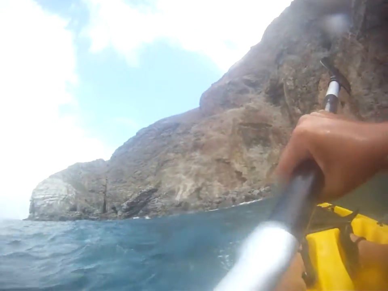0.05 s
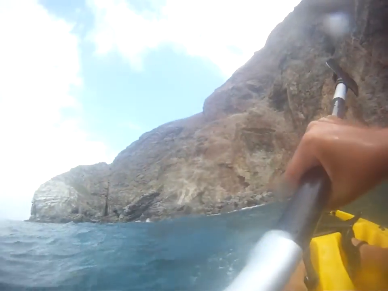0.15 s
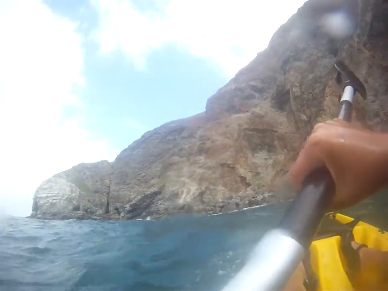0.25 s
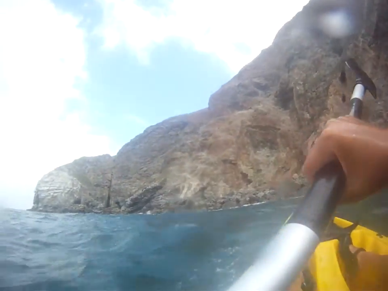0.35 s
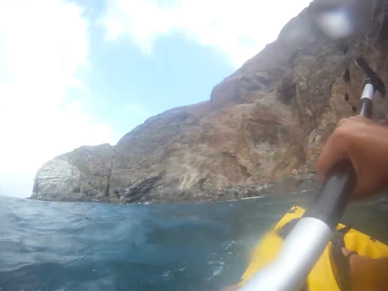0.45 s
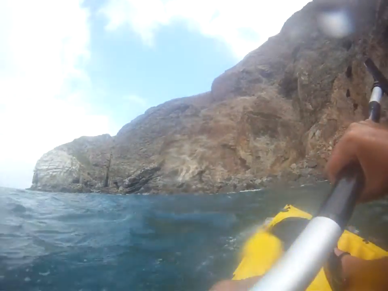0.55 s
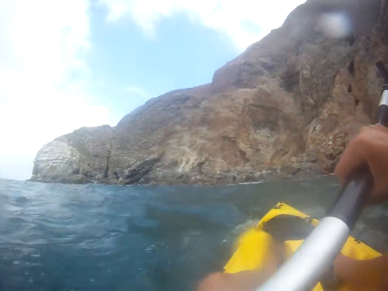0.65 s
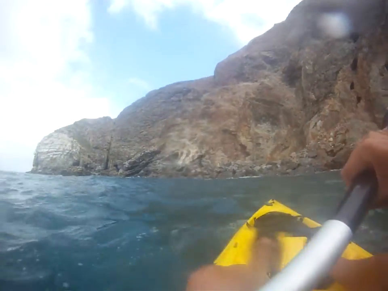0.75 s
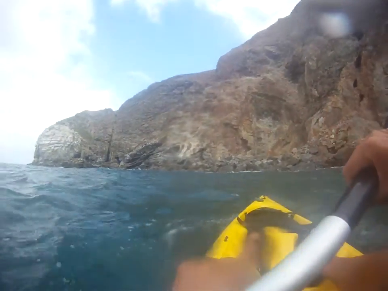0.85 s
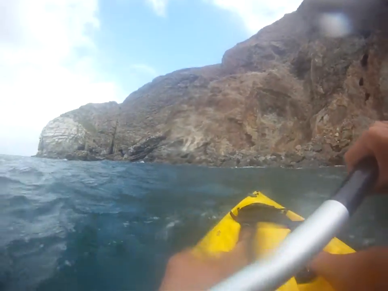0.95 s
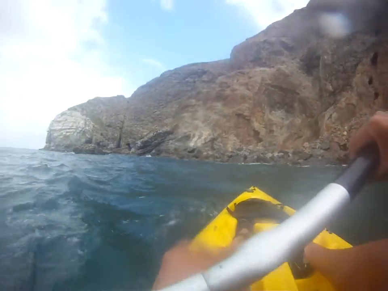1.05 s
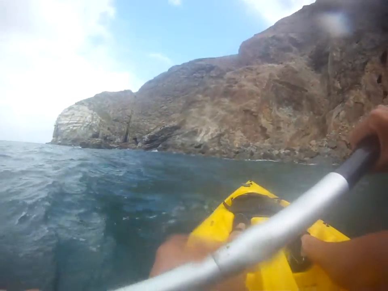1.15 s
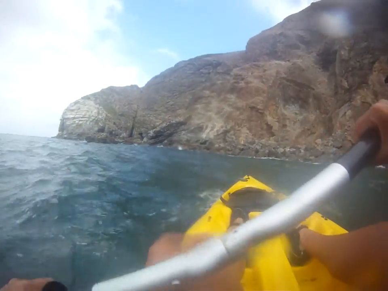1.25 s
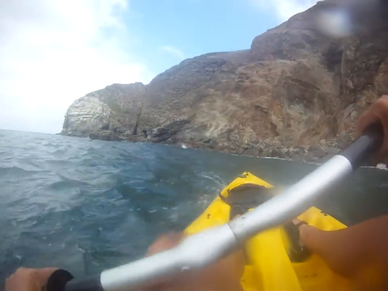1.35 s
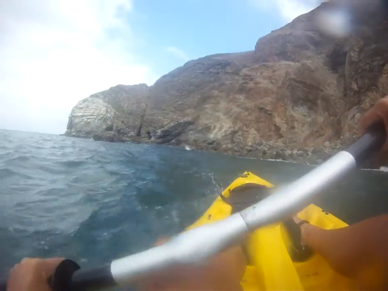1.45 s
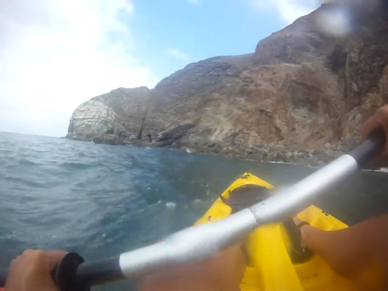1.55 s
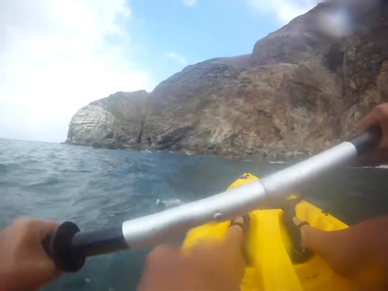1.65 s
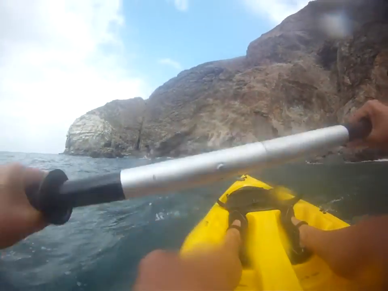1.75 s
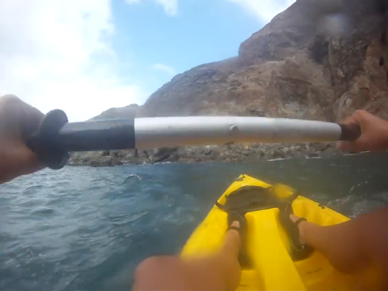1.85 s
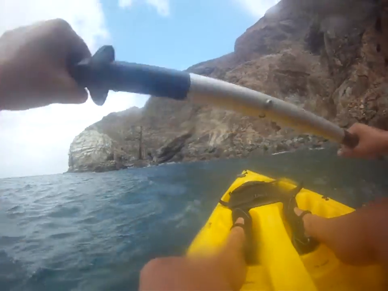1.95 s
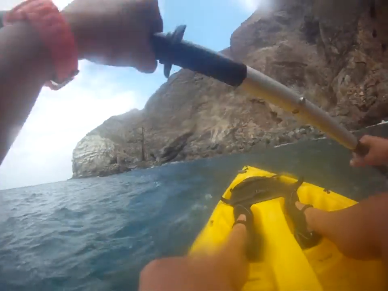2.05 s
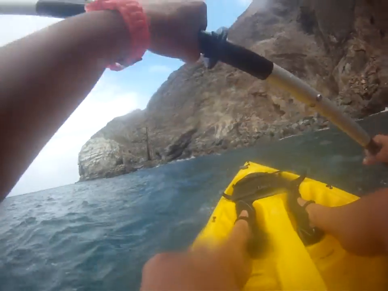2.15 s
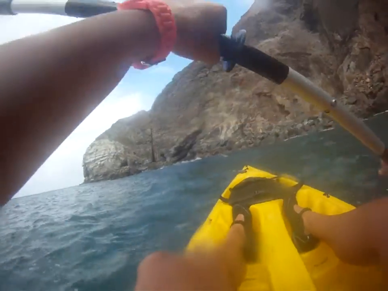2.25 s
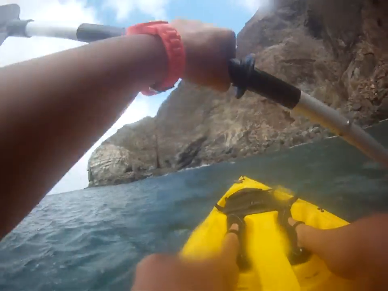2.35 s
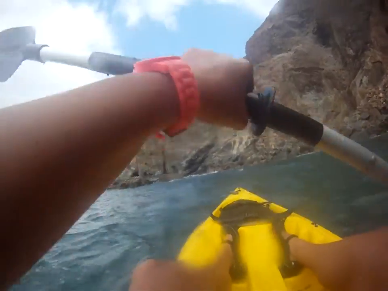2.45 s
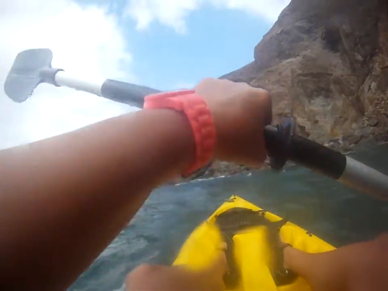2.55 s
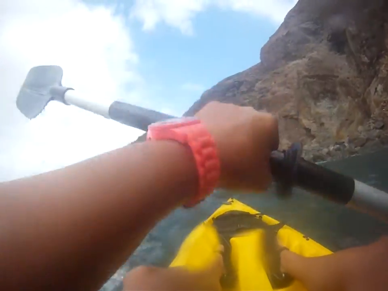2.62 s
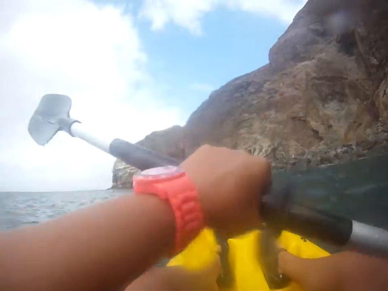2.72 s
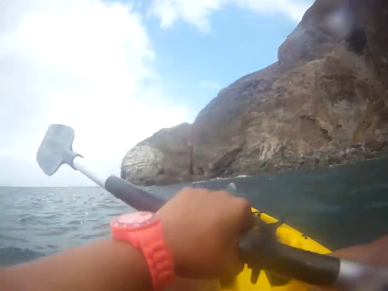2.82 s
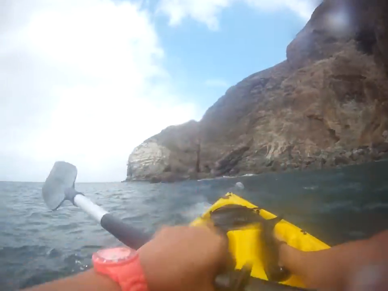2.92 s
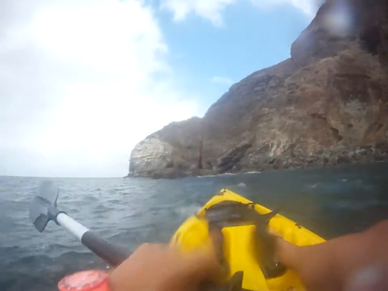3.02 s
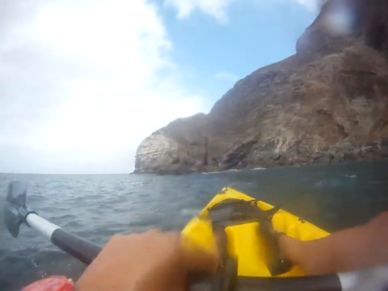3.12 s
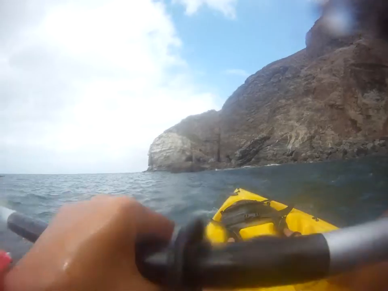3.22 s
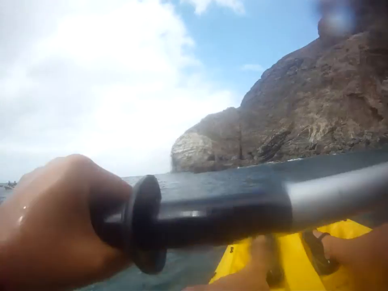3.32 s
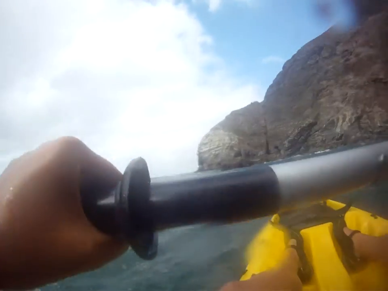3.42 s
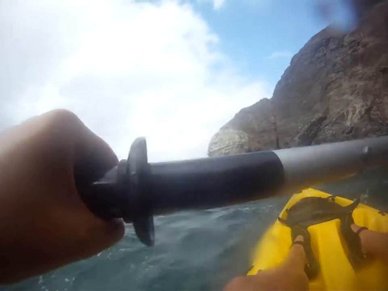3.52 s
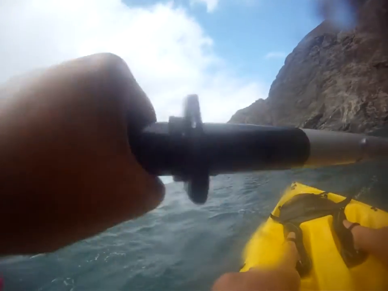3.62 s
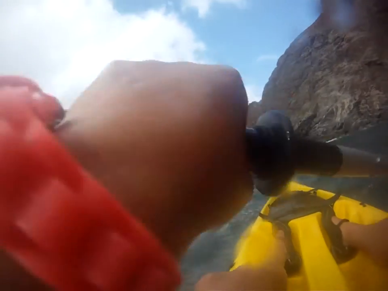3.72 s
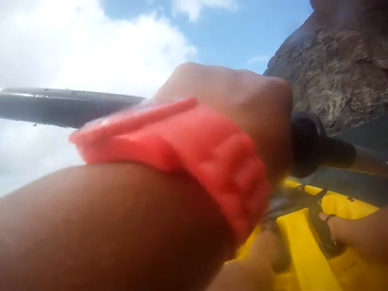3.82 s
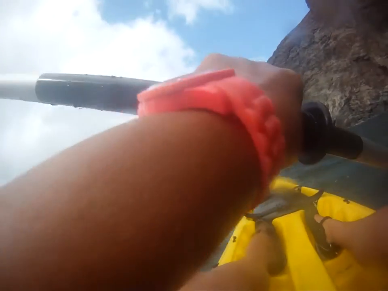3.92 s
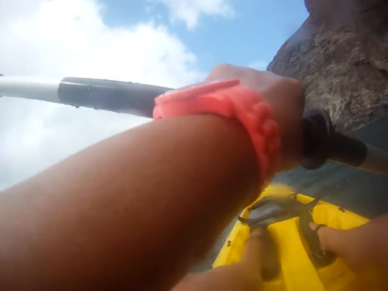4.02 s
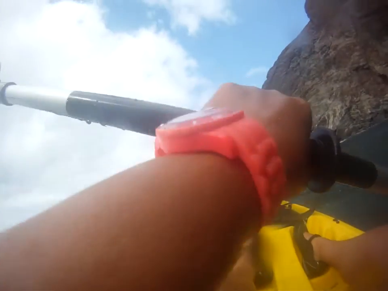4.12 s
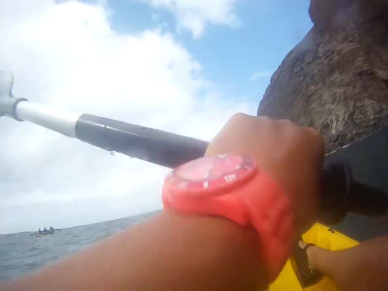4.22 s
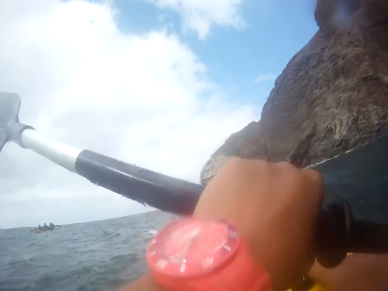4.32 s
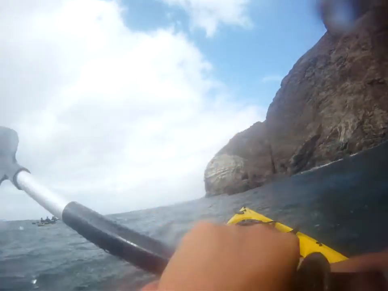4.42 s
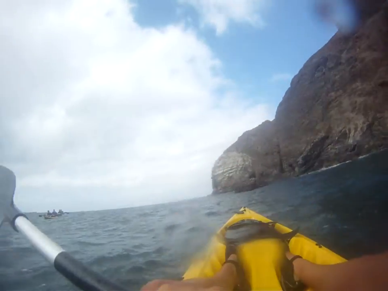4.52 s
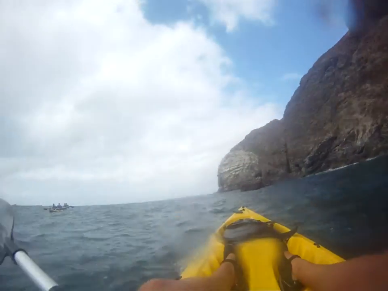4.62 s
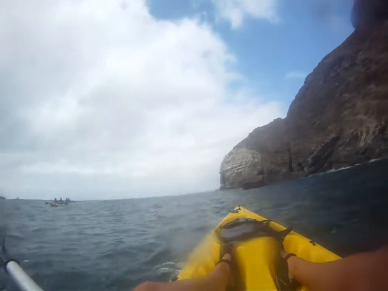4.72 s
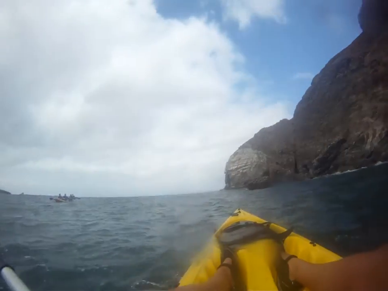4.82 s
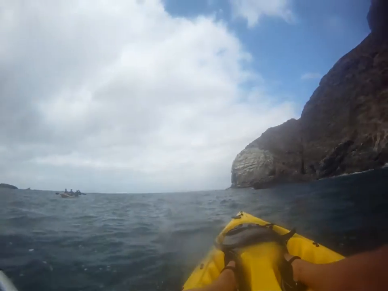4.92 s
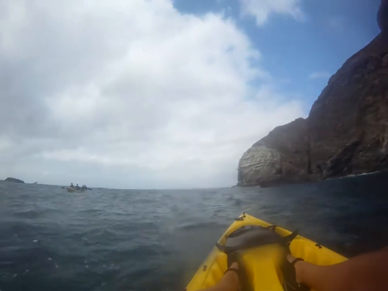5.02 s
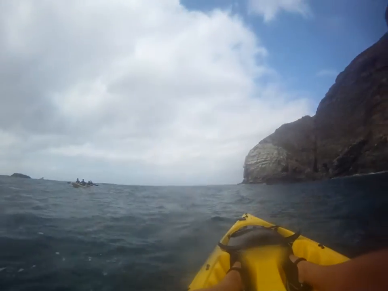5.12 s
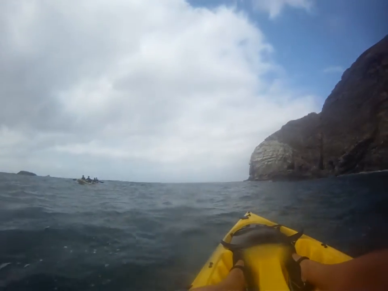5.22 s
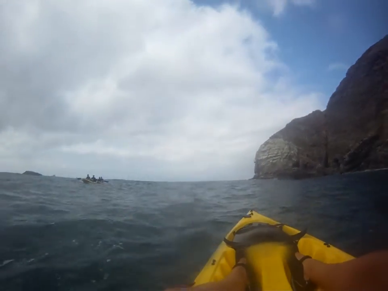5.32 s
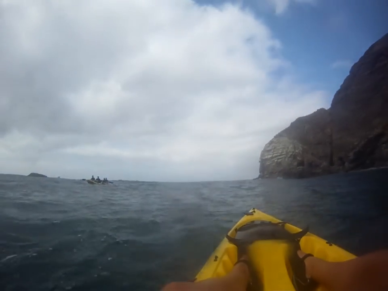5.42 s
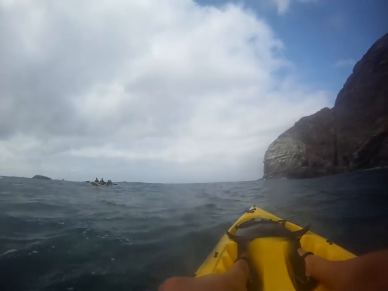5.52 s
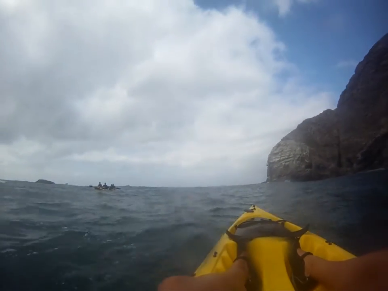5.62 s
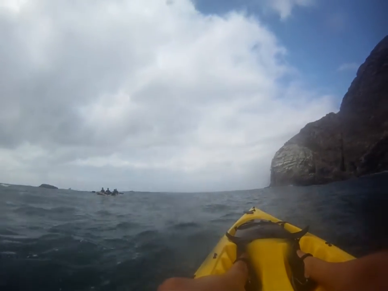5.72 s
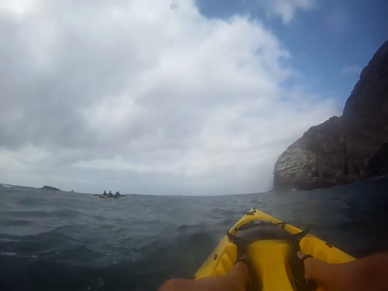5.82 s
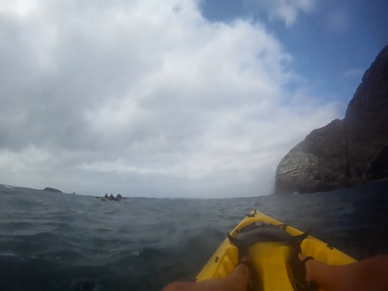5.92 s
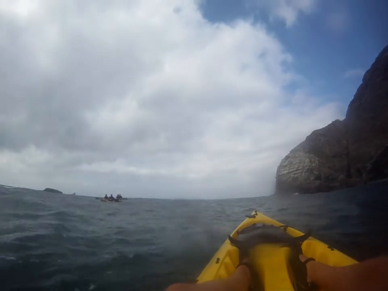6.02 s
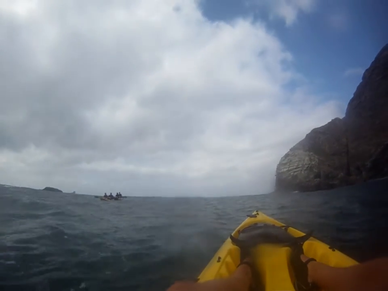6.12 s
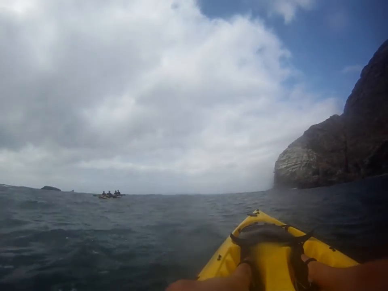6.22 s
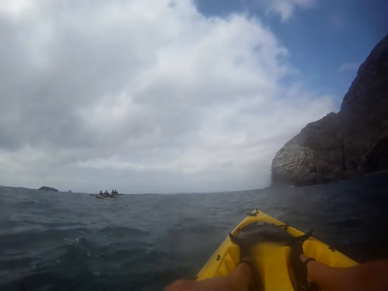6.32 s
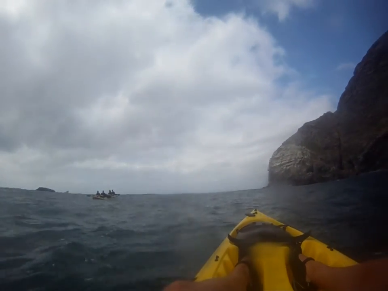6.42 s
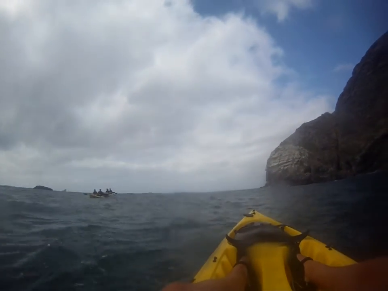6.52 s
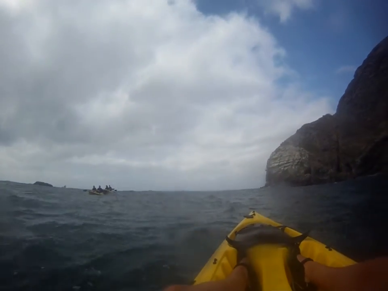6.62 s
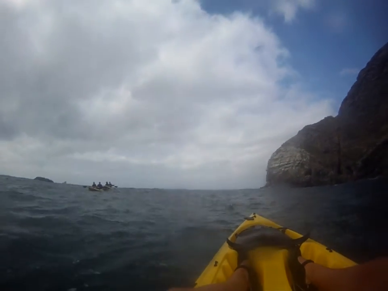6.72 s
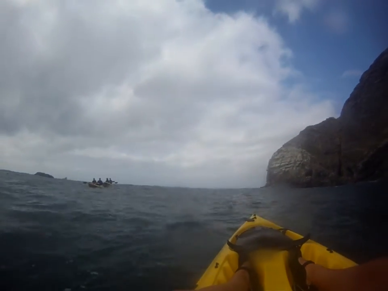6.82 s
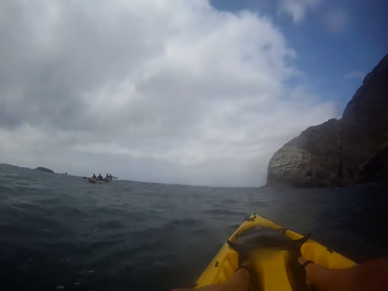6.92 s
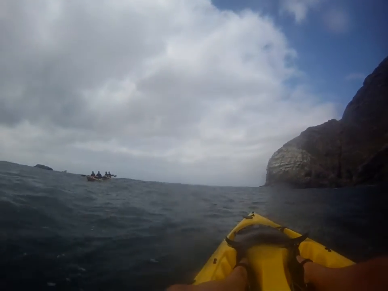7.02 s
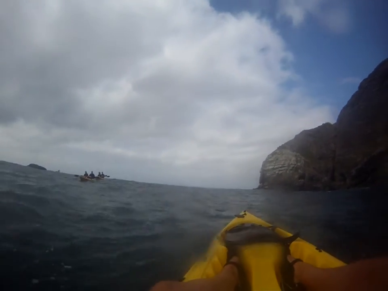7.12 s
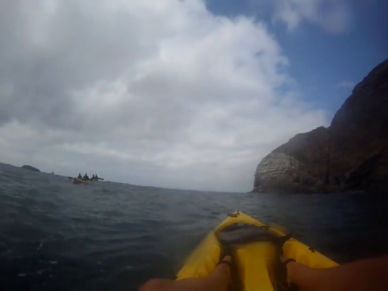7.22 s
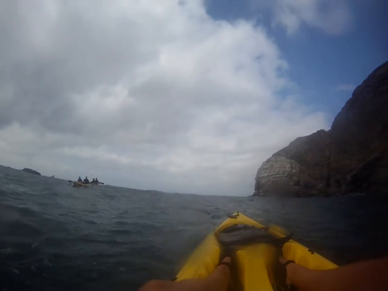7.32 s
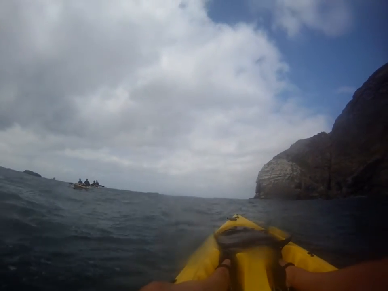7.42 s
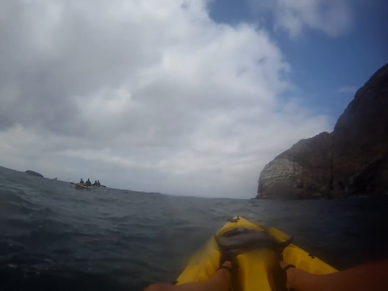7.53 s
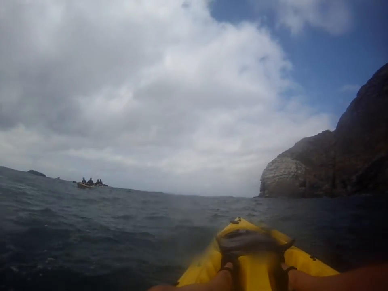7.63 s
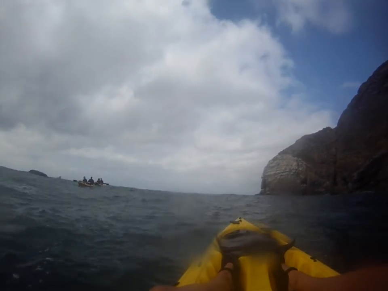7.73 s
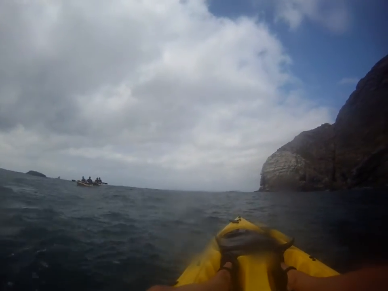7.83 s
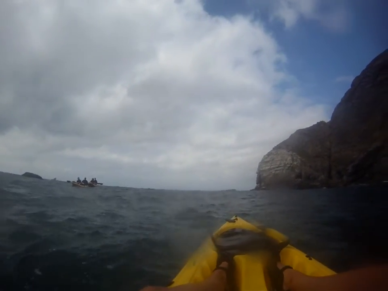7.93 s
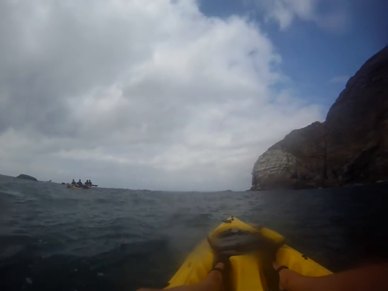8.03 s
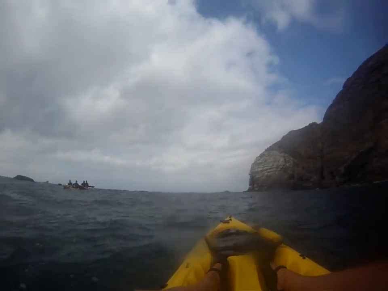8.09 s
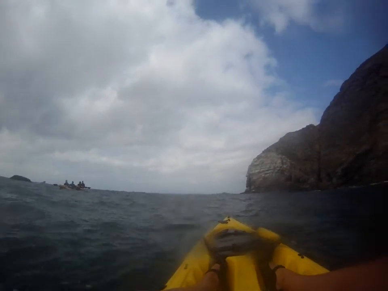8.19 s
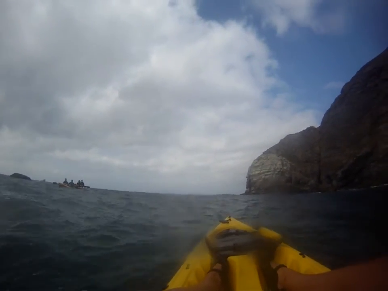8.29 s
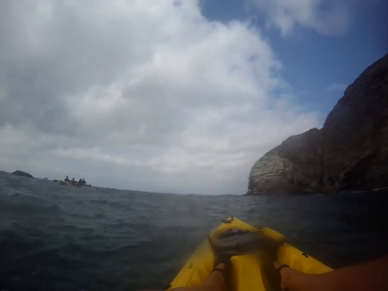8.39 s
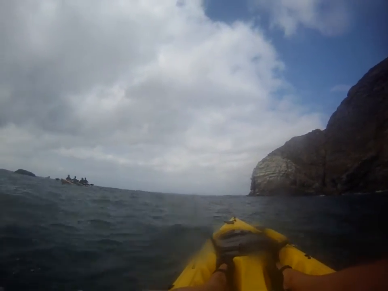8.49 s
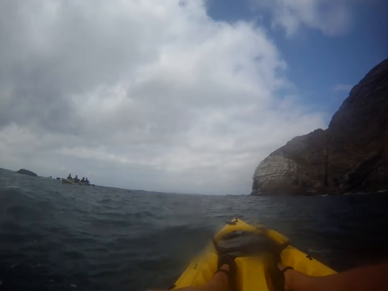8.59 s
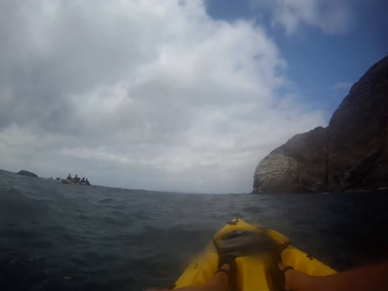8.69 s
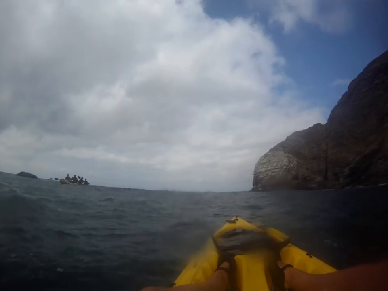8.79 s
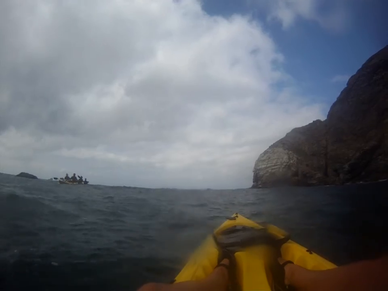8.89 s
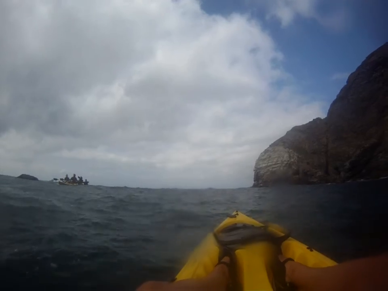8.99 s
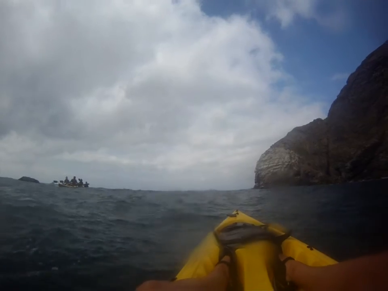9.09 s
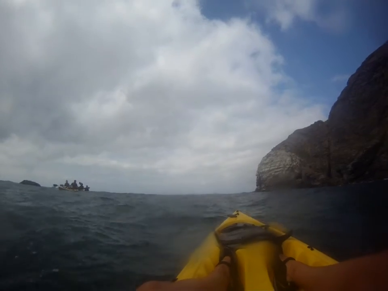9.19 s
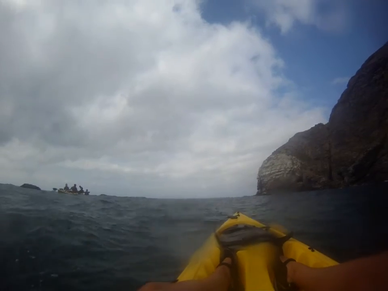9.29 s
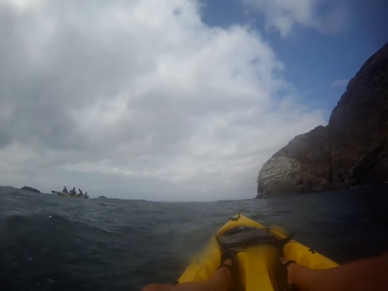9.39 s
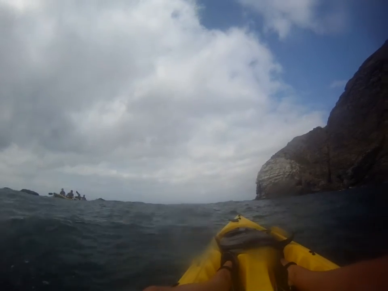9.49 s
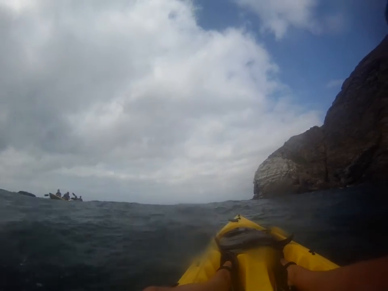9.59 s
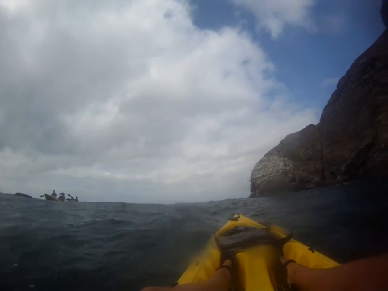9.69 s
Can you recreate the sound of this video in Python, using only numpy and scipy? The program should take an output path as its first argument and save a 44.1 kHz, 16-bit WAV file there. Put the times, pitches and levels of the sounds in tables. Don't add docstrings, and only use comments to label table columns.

```python
import sys
import numpy as np
from scipy import signal
from scipy.fft import rfft, irfft, next_fast_len
from scipy.io import wavfile
from scipy.ndimage import uniform_filter1d, map_coordinates

SR = 44100
rng = np.random.default_rng(int(sys.argv[2]) if len(sys.argv) > 2 else 0)


def boost(x):
    u = np.asarray(x, float) / 20
    return 10 ** u


def wav_record(signal):
    frames = np.transpose(np.atleast_2d(signal))
    bounded = np.clip(frames, -1, 1)
    quanta = np.round(bounded * 32767).astype(np.int16)
    wavfile.write(sys.argv[1], SR, quanta)


N = 429975


def unit(x):
    return x / np.sqrt(np.mean(x ** 2) + 1e-20)


def along(points, hz):
    f, v = np.transpose(points)
    return np.interp(np.log(hz + 1), np.log(f + 1), v)


def wobble(rate):
    knots = rng.standard_normal(int(N * rate / SR) + 4)
    return map_coordinates(knots, [np.arange(N) * rate / SR])


def slaps(rate, fade_s):
    jumps = (rng.random(N) < rate / SR) * rng.exponential(size=N)
    fading = signal.lfilter([1], [1, -np.exp(-1 / (fade_s * SR))], jumps)
    x = uniform_filter1d(fading, size=40)
    return unit(x - x.mean())


def surges(rows):
    t = np.arange(0, N, 64) / SR
    gain = sum(boost(db) * np.exp(-((t - s) / half) ** 2) for s, db, half in rows)
    return np.interp(np.arange(N) / SR, t, gain)


def filtered(x, response):
    m = next_fast_len(N + SR // 2)
    return irfft(rfft(x, m) * response(np.fft.rfftfreq(m, 1 / SR)), m)[..., :N]


def rush(patchy_db, spectrum=((1, 0), (2, 0))):
    z = signal.stft(rng.standard_normal(N), nperseg=256)[2]
    field = uniform_filter1d(rng.standard_normal(z.shape), size=4, axis=0)
    field = uniform_filter1d(field, size=8, axis=1)
    x = signal.istft(z * boost(patchy_db * unit(field)), nperseg=256)[1][:N]
    return unit(filtered(x, lambda hz: boost(along(spectrum, hz))))


def pings(s, db, hz, t60, attack, rise):
    s, db, hz, t60 = (np.asarray(v)[:, None] for v in (s, db, hz, np.abs(t60) + 0.0009))
    step = np.arange(int(t60.max() * SR))
    t = step / SR
    envelope = boost(db - 60 * t / t60) * (1 - np.exp(-t / attack))
    wave = envelope * np.sin(2 * np.pi * hz * t * (1 + rise * t / t60))
    place = np.round(s * SR).astype(int) + step
    return np.bincount(place.ravel(), wave.ravel(), N + SR)[:N]


def resonances(modes, hz, sign):
    return sum(sign ** k * boost(db) * 1j * hz * w / (c * c - hz * hz + 1j * hz * w)
               for k, (c, w, db) in enumerate(modes))


def housing(hz):
    # (centre [Hz], width [Hz], level [dB])
    panels = [(1150, 160, -4), (1400, 190, -10.5), (1722, 157, 2), (1897, 240, -5.5), (2500, 160, -0.5),
              (3010, 143, -4), (3550, 152, 0), (4080, 350, -13), (4660, 200, -19), (5170, 980, -7.5)]
    # (frequency [Hz], level [dB])
    leak = [(300, -28), (900, -22), (2000, -3.5), (3500, -6), (5000, -55)]
    # (centre [Hz], width [Hz], depth [dB])
    notches = [(2750, 150, -5), (3300, 143, -6.5)]
    dips_db = sum(db / (1 + (2 * (hz - c) / w) ** 2) for c, w, db in notches)
    return (resonances(panels, hz, 0.94) + boost(along(leak, hz))) * boost(dips_db)


def sea_level_db():
    # (time [s], wash level [dB])
    sea = [(0.0, -51), (0.33, -48.5), (0.6, -52), (0.91, -55), (1.4, -53.5), (1.67, -52.5), (1.85, -54.5),
           (2.5, -52.5), (2.73, -52.5), (3.1, -51.5), (3.27, -53.5), (3.58, -57.5), (4.03, -55.5),
           (4.4, -53), (4.7, -54.5), (6.4, -56), (8.0, -57.5), (9.75, -58)]
    s, db = np.transpose(sea)
    return np.interp(np.arange(N) / SR, s, db)


def droplets(wash_db, count):
    draw = rng.random((count, 4))
    share = np.cumsum(boost(wash_db))
    s = np.searchsorted(share, draw[:, 0] * share[-1]) / SR
    hz = 1000 * 5.47 ** draw[:, 1]
    size_db = -4 * np.log(draw[:, 2] + 1 / 40)
    t60 = (8 + 14 * draw[:, 3]) / hz
    return unit(pings(s, size_db, hz, t60, attack=0.000092, rise=0.32))


def wash():
    wash_db = sea_level_db()
    stir = np.clip((wash_db + 59.0) / 8, .1, 1.5)
    uneven = 0.67 * wobble(45) + 1.28 * slaps(70, fade_s=.011) + 0.46 * wobble(90)
    water = unit(boost(stir * uneven) * rush(patchy_db=1.0))
    water = water + boost(-18.0) * stir * droplets(wash_db, count=4000)
    return boost(wash_db + 1.78) * unit(filtered(water, housing))


def foam():
    # (time [s], peak [dB], half length [s])
    strokes = [
        (1.15, -58.5, 0.49),
        (1.62, -58, 0.13),
        (2.58, -61, 0.14),
        (3.05, -54, 0.13),
        (3.85, -65, .08),
        (4.4, -57.5, 0.16),
    ]
    # (frequency [Hz], density [dB per Hz])
    fizz_spectrum = [(1700, -47), (2300, 1.5), (3000, 6), (3800, -12), (5500, -10)]
    fizz = boost(1.6 * wobble(60)) * rush(3.9, fizz_spectrum)
    return surges(strokes) * unit(filtered(fizz, housing))


def trickle():
    # (start [s], length [s], level of a drop [dB])
    runs = [
        (0.151, .45, -80),
        (1.498, .28, -82),
        (2.249, .4, -75),
        (2.799, .4, -74.5),
        (4.051, .85, -78),
        (6.701, 0.39, -82),
    ]
    drops_per_s, scatter_db = 40, 11.5
    lowest_hz, pitch_range = 1283, 3.17
    drops = []
    for s, length, db in runs:
        for when, size, pitch in rng.random((round(drops_per_s * length), 3)):
            drops.append((s + length * when, db - scatter_db * size, lowest_hz * pitch_range ** pitch))
    return drops


def puffs():
    # (middle [s], energy [dB], centre [Hz], spread [s])
    splash_rows = [(0.2036, -66, 2500, 0.0028), (.204, -68, 3550, .003), (.3375, -69, 1600, .0053),
                   (.4797, -67.5, 3890, .0048), (1.0535, -74, 1090, 0.0014), (1.192, -68, 2970, 0.0034),
                   (1.3599, -70, 1040, 0.012), (1.606, -70, 3220, 0.0025), (1.6142, -67.5, 1130, 0.0031),
                   (1.657, -68.5, 3300, .002), (1.663, -66.5, 3020, 0.0046), (1.6949, -73, 4210, 0.0023),
                   (1.702, -70, 940, .0095), (1.718, -71.5, 2620, 0.002), (2.0403, -66, 1760, 0.0052),
                   (2.512, -75, 4150, 0.0031), (2.613, -66, 2570, 0.009), (2.49, -76, 1500, .004),
                   (2.7404, -72.5, 3040, 0.0027), (2.869, -68.5, 3220, 0.019), (2.948, -74, 3400, 0.0016),
                   (3.031, -71, 2570, .02), (3.0604, -71, 3240, 0.0068), (3.1, -73, 2700, 0.013),
                   (3.8575, -71, 3340, 0.0016), (3.858, -71.5, 1950, .003), (4.392, -68.5, 3340, 0.0019),
                   (4.444, -69.5, 3580, 0.0022), (4.5218, -69, 1690, 0.0014), (4.5285, -65.5, 1600, 0.0016),
                   (4.538, -75, 1750, 0.0027), (4.599, -77, 2430, 0.0046), (5.4693, -71.5, 2930, .004),
                   (8.2738, -73, 2560, .0024)]
    # (time [s], energy [dB], centre [Hz])
    drips = [(.335, -69, 3320), (.3798, -72, 2580), (0.5777, -70.5, 1970), (.8717, -74, 895),
             (1.0498, -73, 3680), (1.249, -77, 3000), (1.5883, -73.5, 750), (1.843, -74, 2500),
             (2.098, -71.5, 1030), (2.2968, -70, 1290), (2.381, -71, 1800), (2.39, -72, 1750),
             (2.8718, -74, 940), (2.9493, -72, 1550), (2.999, -73, 2380), (3.3037, -74.5, 2480),
             (3.3119, -73.5, 1020), (4.9248, -76, 2910), (2.635, -72, 1910), (5.501, -72.5, 1630),
             (6.302, -77, 1370), (6.7675, -73, 2420), (6.791, -74, 1480), (6.791, -78, 2520),
             (6.8775, -81, 3160), (7.4373, -77, 3550), (8.0388, -77, 2620), (8.0448, -77, 1170),
             (8.2042, -75.5, 980), (8.5765, -77.5, 2630), (8.88, -73, 2380)]
    # (time [s], energy
    # [dB], centre [Hz])
    narrow_drops = [(3.9584, -74.5, 2800), (3.9593, -68.5, 1630), (4.068, -78, 1740), (4.1135, -73, 2600),
                    (4.151, -75, 1940), (4.199, -72.5, 1730), (4.227, -71.5, 3300), (4.26, -67, 1660),
                    (4.268, -77, 3300), (4.282, -74, 1750), (4.3549, -73, 3260), (4.3768, -69.5, 1680),
                    (4.414, -76, 1170), (4.442, -72, 1580), (4.504, -82, 3100), (4.67, -72, 1600),
                    (4.817, -77, 3550), (4.08, -77, 1150), (4.152, -81, 3200), (4.329, -79, 3200),
                    (4.43, -76, 3550), (4.437, -74, 1850), (4.5935, -73, 1680), (4.6, -75, 3050),
                    (4.692, -76, 1730), (4.787, -73.5, 1670), (4.8155, -77, 1730), (4.902, -76, 1820),
                    (2.433, -78, 3500), (2.6333, -69.5, 3800), (2.637, -75, 3930), (6.288, -72, 3000),
                    (6.29, -73, 2500), (6.298, -73.5, 2950), (6.301, -75, 2500)]
    # (time [s], energy [dB], spread [s])
    sprays = [(.4713, -77, .0014), (.5391, -80, 0.0018), (.6817, -76, 0.0079), (1.5471, -83, 0.0011),
              (1.5807, -77, 0.0068), (1.7207, -76.5, 0.0027), (2.0404, -75, 0.0077), (2.635, -75, 0.0041),
              (3.7065, -81, 0.0096), (4.801, -85, .0015), (4.821, -83, .003), (4.845, -77, 0.0025),
              (4.878, -85, .002), (4.84, -80, .02)]
    return ([(s, db, hz, 320 * (hz / 1000) ** .45, spread) for s, db, hz, spread in splash_rows]
            + [(s, db, hz, 165, 0.0018) for s, db, hz in drips]
            + [(s, db, hz, 106, .0014) for s, db, hz in narrow_drops + trickle()]
            + [(s, db, 4770, 190, spread) for s, db, spread in sprays])


def splashes():
    lead = 1024
    out, t = np.zeros(N + SR), np.arange(4096) / SR
    hz = np.fft.rfftfreq(len(t), 1 / SR)
    for s, db, centre_hz, spread_hz, spread in puffs():
        u = np.maximum(t - lead / SR + 1.21 * spread + 0.0013, 0) / (1.7 * spread)
        envelope = u ** 0.21 * np.exp(-u)
        ragged = boost(3 * np.repeat(rng.standard_normal(32), 128))
        spray = rng.standard_normal(len(t)) * ragged * envelope
        band = resonances([(centre_hz, 4.2 * spread_hz, 0)], hz + 1, 1) ** 3
        puff = irfft(rfft(spray) * band * housing(hz))
        out[round(s * SR):][:len(t)] += boost(db + 1.9) * puff * np.sqrt(SR) / np.linalg.norm(puff)
    return out[lead:N + lead]


def clicks():
    # (time [s], peak [dB])
    strikes = [(0.1994, -47), (0.2793, -48), (0.3082, -41), (0.3306, -48), (0.4529, -47), (0.5352, -50),
               (1.1857, -54), (1.278, -48), (1.5449, -51), (1.6921, -48), (1.8422, -53), (2.2727, -52),
               (2.4304, -48), (2.5102, -49), (2.7571, -54), (2.9447, -46), (2.9976, -49), (3.8571, -49),
               (3.8861, -51), (3.9569, -57), (4.0634, -58), (4.1285, -51), (4.4408, -51), (4.5261, -55),
               (4.7257, -58), (5.4645, -52), (5.4969, -52), (6.2844, -55), (7.4345, -54), (8.8774, -62)]
    s, db = np.transpose(strikes)
    place = np.round(s * SR).astype(int) + 40
    blows = np.bincount(place, boost(db + 24) * rng.choice([-1, 1], len(s)), N)
    thin_wall = [(4900, 2500, 0)]  # (centre [Hz], width [Hz], level [dB])
    return filtered(blows, lambda hz: resonances(thin_wall, hz, 1) + boost(-3) * housing(hz))


def drumming():
    # (time [s], peak [dB], half length [s])
    drum_waves = [(.19, -43, 0.1), (.34, -44, 0.045), (.76, -51.5, 0.31), (.9, -54, 0.055),
                  (1.12, -44, 0.14), (1.4, -45.5, 0.096), (1.68, -44.5, 0.091), (1.9, -57, .05),
                  (2.18, -47, 0.026), (2.35, -55, 0.065), (3.04, -68, 0.037), (3.25, -55, 0.078),
                  (3.75, -56.5, 0.26), (3.95, -59, 0.069), (4.1, -52, .06), (4.27, -58, 0.031),
                  (4.38, -66, 0.041), (4.63, -60, 0.07), (5.9, -66, 0.08), (6.52, -62, 0.046),
                  (7.6, -62, 0.048), (8.35, -67, .1)]
    return surges(drum_waves)


def slosh(chop_db, drummed):
    # (frequency [Hz], density [dB per Hz])
    slosh_spectrum = [(59, -36), (100, -3.5), (209, -1.5), (300, -2.5), (340, -3.5), (679, -7),
                      (1140, -13.5), (1500, -13), (1950, -36), (3300, -120)]
    # (time [s], peak [dB], half length [s])
    laps = [
        (5.3, -81, 0.12),
        (6.25, -71, 0.17),
        (7.6, -73, 0.046),
        (8.25, -69, 0.19),
        (8.7, -75, 0.19),
    ]
    gain = boost(-59 + 0.48 * chop_db) + 0.053 * drummed + surges(laps)
    return gain * unit(boost(1.26 * wobble(25)) * rush(0.39, slosh_spectrum))


def seat_gain(calm_db, chop_db):
    return boost(calm_db + 0.81 * chop_db + 1 * wobble(7))


def heave(chop_db):
    # (frequency [Hz], density [dB per Hz])
    heave_spectrum = [(12, -29), (25, 5.5), (60, 2), (90, -20), (200, -51)]
    # (time [s], peak [dB], half length [s])
    lifts = [(0, -50, 0.087), (.35, -42.5, .06), (.54, -44, 0.068), (.8, -56, 0.067), (1.0, -48, 0.14),
             (1.27, -49, 0.11), (1.6, -51, .1), (1.84, -53, 0.13), (2.15, -48, 0.08), (2.38, -50, .07),
             (2.55, -56, 0.1), (3.0, -52, .08), (3.39, -50, 0.15), (3.7, -53, 0.046), (3.83, -46, 0.095),
             (3.97, -52, .06), (4.2, -54, .1), (4.4, -46.5, 0.091), (4.63, -50.5, 0.14), (4.85, -56, 0.11),
             (5.6, -64, .15), (5.92, -59, 0.043), (6.33, -57, 0.041), (6.51, -49, 0.038), (7.2, -55, 0.11),
             (6.9, -64, .06), (7.6, -58, .08), (8.3, -57, 0.2), (9.04, -60.5, 0.16), (9.72, -63, 0.082)]
    return (seat_gain(-65, chop_db) + 0.43 * surges(lifts)) * rush(.3, heave_spectrum)


def boom(chop_db, drummed):
    # (frequency [Hz], density [dB per Hz])
    boom_spectrum = [(40, -24), (75, 3), (120, -1.5), (200, -11.5), (320, -24), (600, -54)]
    return (seat_gain(-64.5, chop_db) + 0.52 * drummed) * rush(0.46, boom_spectrum)


def gulps():
    # (time [s], peak [dB], pitch [Hz], t60 [s])
    pockets = [(1.047, -36.5, 235, 0.041), (1.355, -45.5, 240, 0.16), (1.578, -38, 450, 0.03),
               (1.719, -31.5, 254, 0.036), (2.342, -46, 396, 0.081), (2.64, -35, 390, 0.028),
               (2.904, -46, 443, 0.086), (3.4, -44, 188, 0.092), (3.43, -43.5, 257, 0.075),
               (4.887, -54, 267, 0.054), (5.222, -45.5, 268, 0.074), (5.617, -35, 424, 0.03),
               (6.479, -32, 229, 0.049), (6.512, -38, 254, 0.05), (7.598, -46, 218, 0.095),
               (7.626, -45, 236, 0.054), (7.635, -49, 330, .07), (7.49, -52, 350, .06),
               (7.04, -49, 150, .1)]
    s, db, hz, t60 = np.transpose(pockets)
    return pings(s, db + 3, hz, t60, attack=0.0051, rise=0.069) * boost(2.5 * wobble(90))


def thumps():
    # (time [s], peak [dB], pitch [Hz], t60 [s])
    hits = [
        (0.525, -26, 48, 0.083),
        (2.16, -37, 35, 0.15),
        (4.075, -34.5, 42.3, 0.1),
    ]
    return -pings(*np.transpose(hits), attack=0.0033, rise=-0.49)


def paddle_knock():
    # (time [s], peak [dB], pitch [Hz], t60 [s])
    knock_modes = [
        (2.4775, -26, 1400, 0.014),
        (2.478, -30, 1130, 0.014),
        (2.4785, -33, 900, 0.016),
        (2.479, -22.5, 690, 0.018),
        (2.4823, -37, 298, 0.039),
        (2.483, -43, 474, .025),
        (2.4775, -38, 1750, .01),
        (2.489, -38, 620, .015),
    ]
    return pings(*np.transpose(knock_modes), attack=0.0017, rise=-0.064)


def hull():
    chop_db = sea_level_db() + 58
    drummed = drumming()
    rumble = slosh(chop_db, drummed) + heave(chop_db) + boom(chop_db, drummed)
    return rumble + gulps() + thumps() + paddle_knock()


def tick():
    # (centre [Hz], width [Hz], level [dB])
    case_modes = [(2250, 460, 5), (4700, 680, -7.5), (3700, 500, -10), (970, 69, 4), (2700, 110, -13),
                  (1850, 150, -2)]
    blow = np.zeros(N)
    blow[round(.4244 * SR)] = boost(12.0)
    stiff = lambda hz: (hz * hz / (hz * hz - 1500 ** 2 - 1j * hz * 1900)) ** 2
    return filtered(blow, lambda hz: stiff(hz) * resonances(case_modes, hz, -0.91))


def scene():
    return np.tile(wash() + foam() + splashes() + clicks() + hull() + tick(), (2, 1))


def input_filter(hz):
    poles = np.exp(1j * np.pi * (np.arange(11) + 6) / 11)
    return np.prod([(1 - 1j * hz / 5450 / p) ** -1.6 for p in poles], axis=0)


def channel_noise():
    # (frequency [Hz], density [dB per Hz])
    noise_spectrum = [(60, -16.5), (600, -2), (1300, -13), (2100, -15), (3200, -8.5), (4500, -5.5),
                      (5500, -9.5), (6000, -49), (6500, -21), (7400, -7.5), (8500, -18), (9800, -50)]
    apart = boost(-83.0) * rush(2.2, noise_spectrum)
    return np.array([apart, -apart])


def band_limit(x):
    return signal.sosfilt(signal.butter(12, 15295, fs=SR, output="sos"), x)


def record(dry):
    smooth = filtered(dry, input_filter)
    slow = signal.resample_poly(smooth, 40, 147, axis=1)
    slow = slow + boost(-77.5) * rng.standard_normal(slow.shape[1])
    held = np.repeat(slow, 4, axis=1)
    held = signal.resample_poly(held, 147, 160, axis=1)[:, :N]
    held = filtered(held, lambda hz: np.where(hz < 15295, 1, boost(-24)))
    return band_limit(held + channel_noise())


dry = scene()
out = record(dry)
wav_record(out)
```